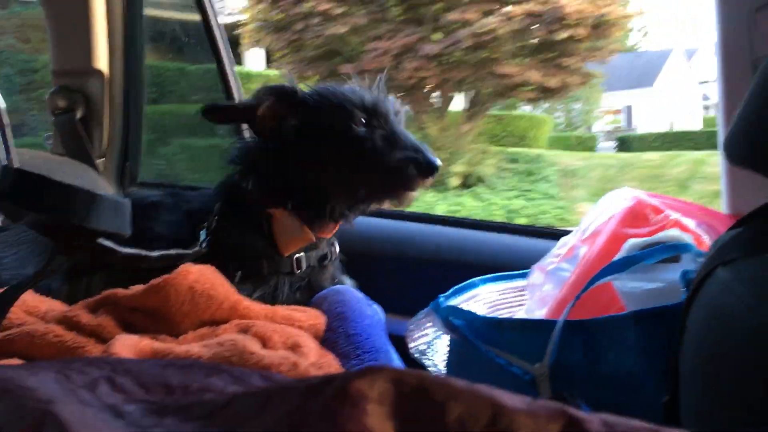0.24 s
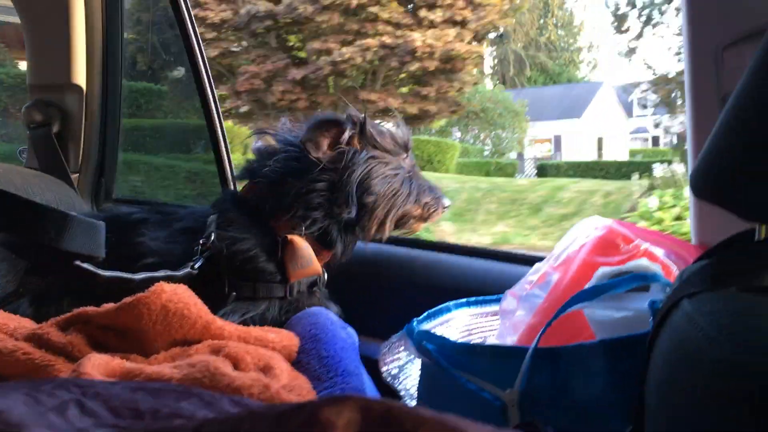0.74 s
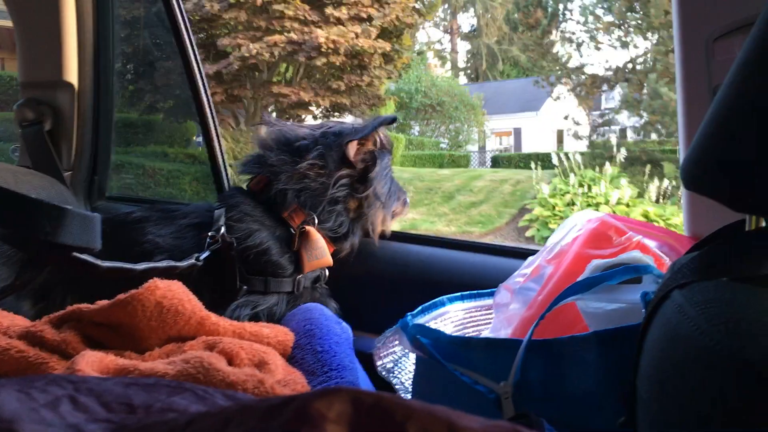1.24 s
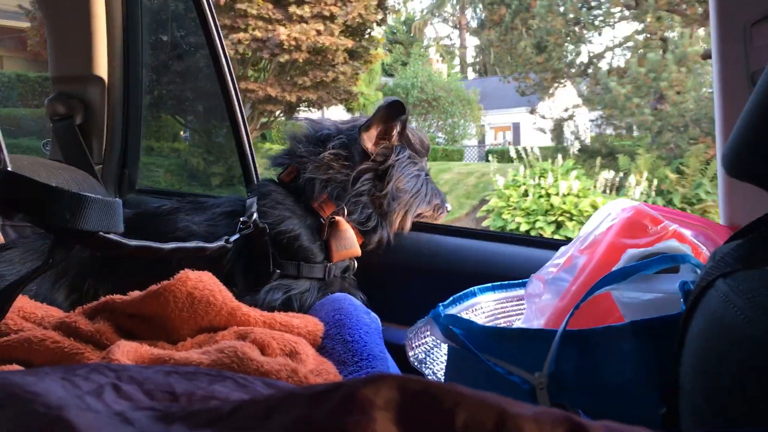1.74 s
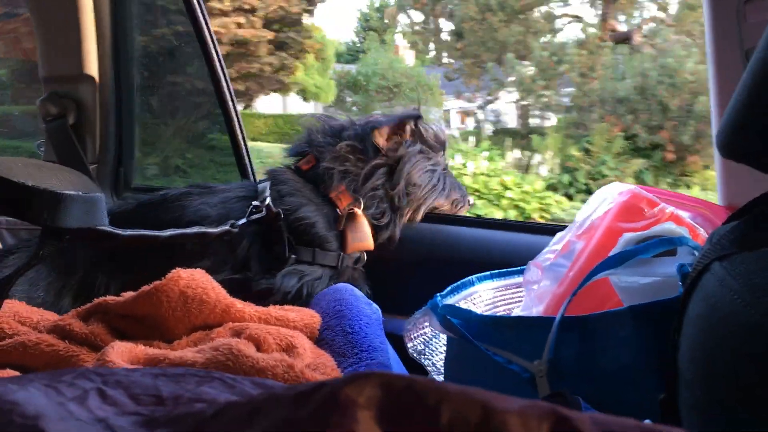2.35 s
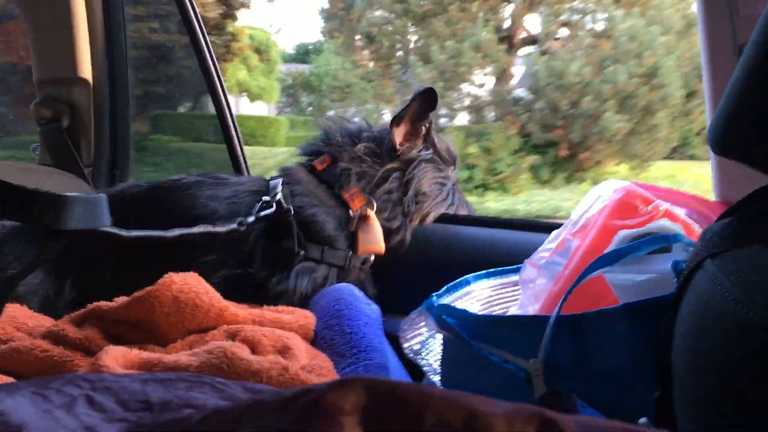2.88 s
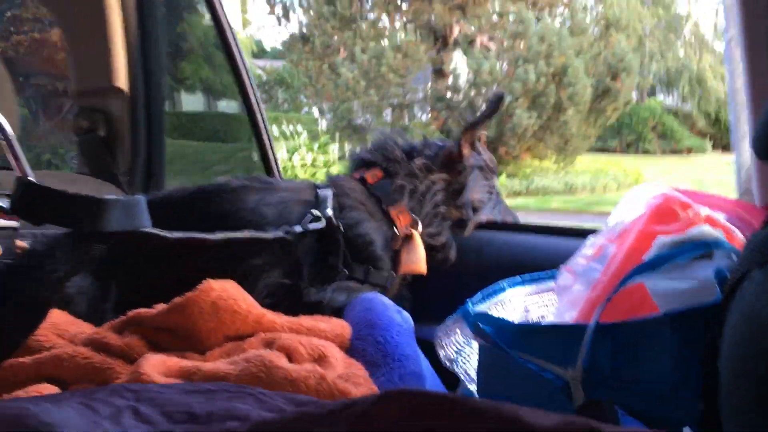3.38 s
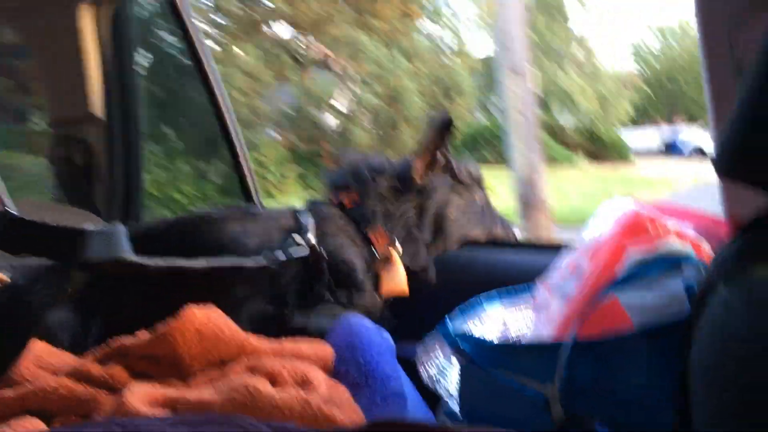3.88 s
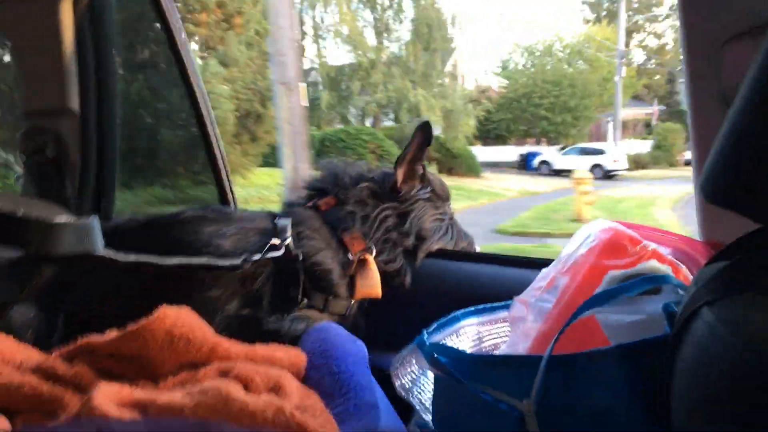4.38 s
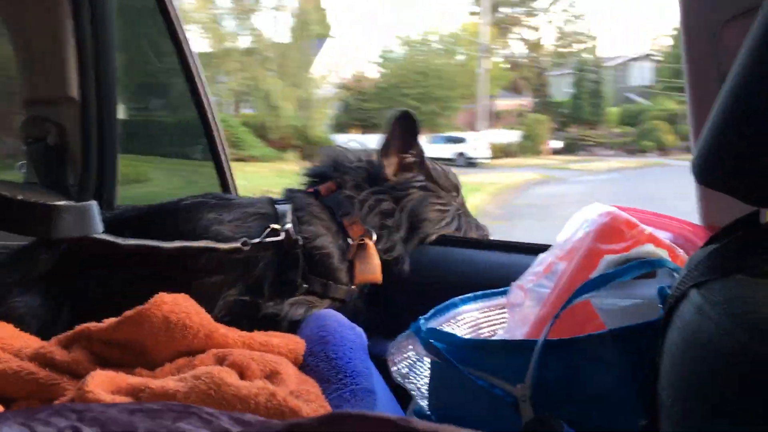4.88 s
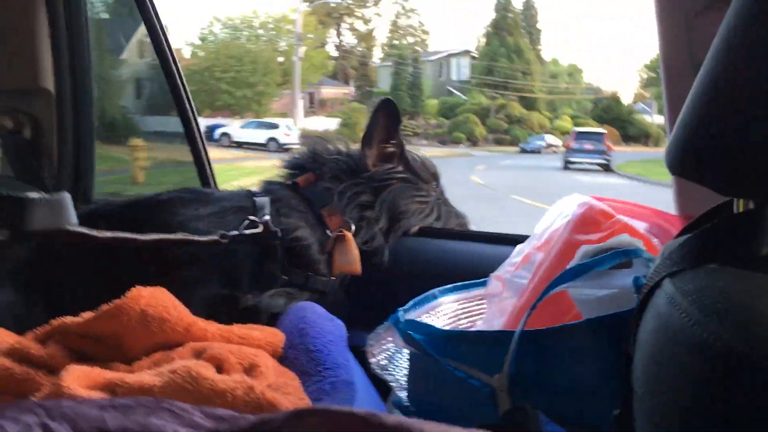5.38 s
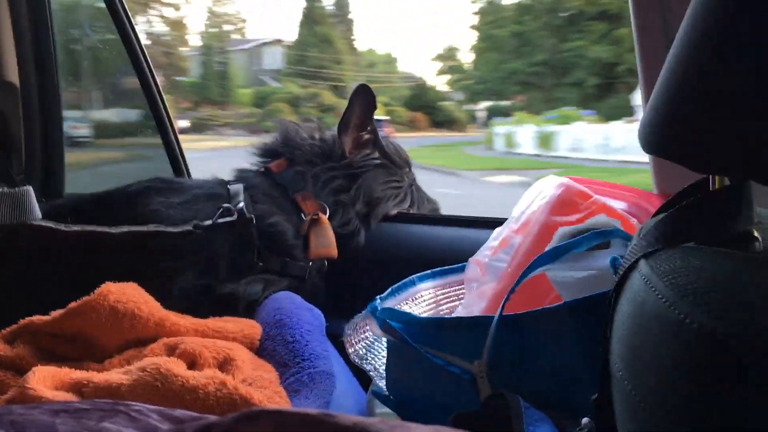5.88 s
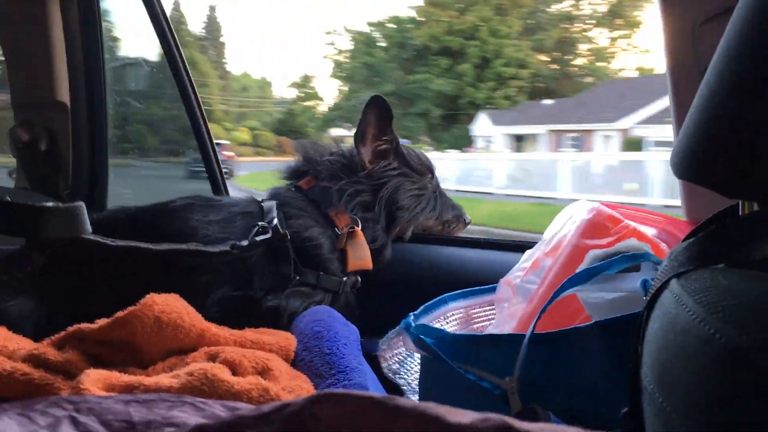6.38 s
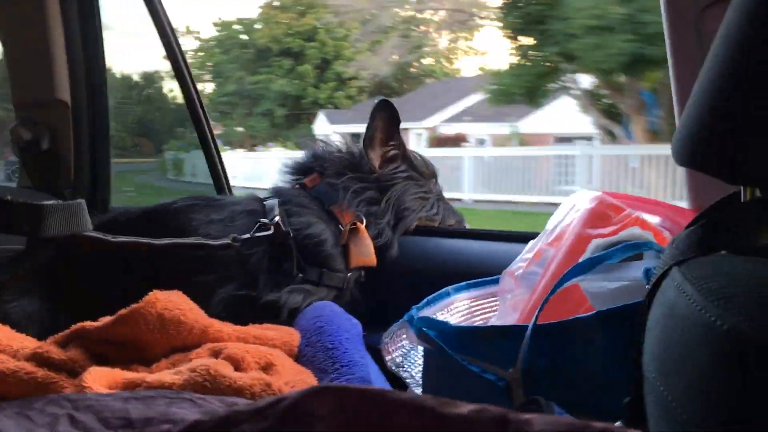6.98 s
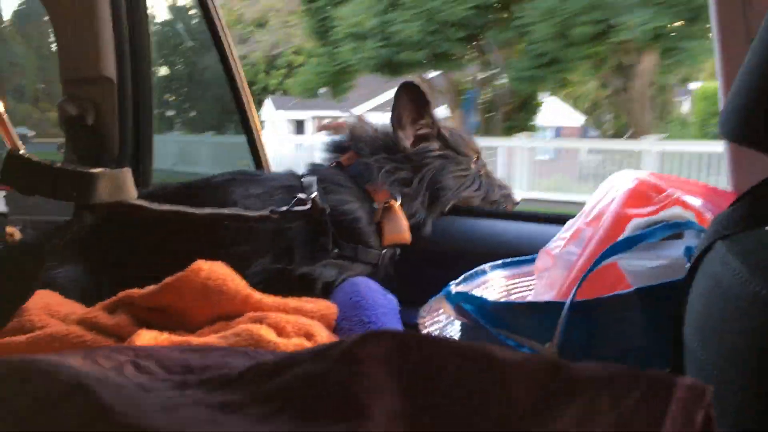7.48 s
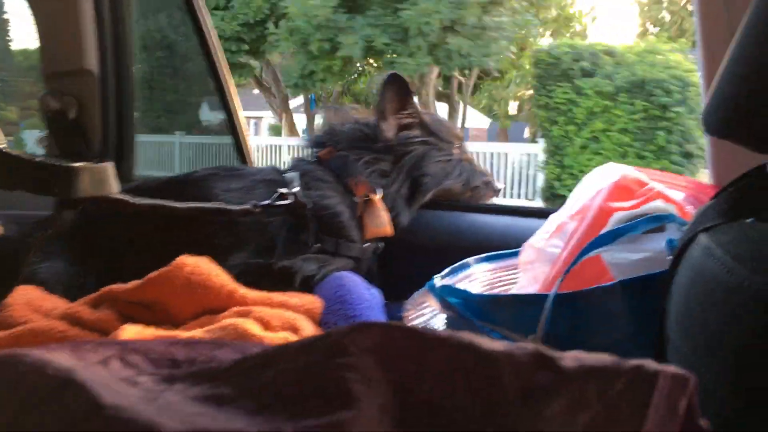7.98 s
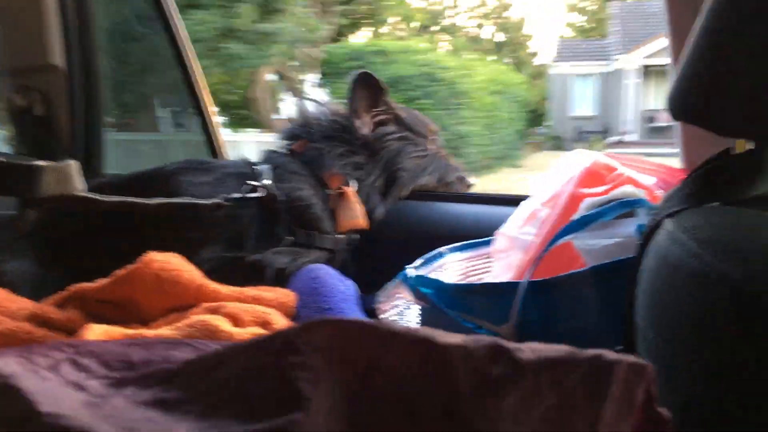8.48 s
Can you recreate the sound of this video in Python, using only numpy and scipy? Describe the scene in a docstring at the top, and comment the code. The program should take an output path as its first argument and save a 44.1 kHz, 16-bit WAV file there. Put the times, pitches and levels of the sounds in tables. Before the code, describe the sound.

A small dog whines in breaking, gliding high notes inside a moving car, over deep road rumble, ticking indicator and a growing engine hum, then snorts.

```python
"""A small dog whines in a car from the start: gliding notes from its vocal folds and a thin whistle near 7.5 kHz.
Road rumble, tyre roar and wind hiss, made of shaped noise, run throughout; bumps ring the car body.
Hard hits and an indicator relay, both bursts of noise, join within a second; the tyres roar louder from 1.7 s.
The engine enters at 3.1 s as a stack of sine tones; at 7.3 s the dog snorts in eight quick flaps of noise.
Dog and small hits get a short cabin echo, and a phone close by cuts the highest treble of everything."""
import sys
import numpy as np
from scipy import signal
from scipy.fft import rfft, irfft
from scipy.io import wavfile
from scipy.ndimage import uniform_filter1d

SR = 44100
rng = np.random.default_rng(int(sys.argv[2]) if len(sys.argv) > 2 else 0)


def transcribe(signal):
    """Save signal, clipped to [-1, 1], as a 16-bit WAV file at the path in sys.argv[1]."""
    frames = np.atleast_2d(signal).T
    limited = np.clip(frames, -1, 1)
    pcm = np.round(limited * 32767).astype(np.int16)
    wavfile.write(sys.argv[1], SR, pcm)


N = 385434
TIME = np.arange(N) / SR  # s
TOP_HZ = 15810  # highest frequency that the phone lets through


def undb(db):
    """Turn a level in dB into a gain."""
    return 10 ** (np.asarray(db) / 20)


def unit(x):
    """Scale a sound to an rms strength of 1."""
    return x / np.sqrt(np.mean(x ** 2))


def shape(points, hz):
    """Read a (frequency [Hz], level [dB]) table at any frequency, along a logarithmic pitch scale."""
    table_hz, db = np.transpose(points)
    return np.interp(np.log(np.maximum(hz, 1)), np.log(table_hz), db)


def walk(rate):
    """Wander at random: levels held for 1 / rate seconds, then smoothed twice; spread near 1."""
    hold = int(SR / rate)
    steps = np.repeat(rng.standard_normal(N // hold + 1), hold)
    smooth = uniform_filter1d(uniform_filter1d(steps, hold), hold)
    return 1.315 * smooth[:N]


def resonant_noise(size, modes):
    """Noise ringing in hollows (Hz, width Hz, dB), each filtered twice for steep sides; rms 1."""
    white, out = rng.standard_normal(size), 0
    for hz, width, db in modes:
        b, a = signal.iirpeak(min(hz, .45 * SR), hz / width, SR)
        once = signal.lfilter(b, a, white)
        out = out + undb(db) * signal.lfilter(b, a, once)
    return unit(out)


def coloured_noise(points, flicker_db, flicker_rate):
    """Noise with the colour of a table; each octave flickers on its own; rms 1."""
    hz = np.fft.rfftfreq(N, 1 / SR)
    lowest_hz, highest_hz = points[0][0], points[-1][0]
    spectrum = rfft(rng.standard_normal(N)) * undb(shape(points, hz)) * (hz > lowest_hz)
    octave = np.log2(np.maximum(hz, 1) / lowest_hz)
    out = np.zeros(N)
    for centre in range(int(np.log2(highest_hz / lowest_hz)) + 2):
        band = irfft(spectrum * np.clip(1 - abs(octave - centre), 0, 1), N)
        out += band * undb(flicker_db * walk(flicker_rate))
    return unit(out)


def phrases(tables, edge_s):
    """Glide through the rows of all notes, with a gate that opens for each; touching notes cross-fade."""
    s, *columns = np.transpose(sorted(row for table in tables for row in table))
    gate = np.zeros(N)
    for table in tables:
        start, end = table[0][0], table[-1][0]
        # a note that starts at zero is open at once
        nearest_edge = np.minimum(TIME - start + (start <= 0), end - TIME)
        gate += np.clip(nearest_edge / edge_s + .5, 0, 1)
    return [np.interp(TIME, s, c) for c in columns], np.minimum(gate, 1)


def add(out, s, sound):
    """Mix a sound in at a given time."""
    i = int(s * SR)
    out[i:i + len(sound)] += sound[:N - i]


def burst(modes, t60_s, rise_s):
    """A puff of ringing noise that rises fast and falls by 60 dB in t60_s."""
    t = np.arange(int(.15 * SR)) / SR
    fade = undb(-60 * t / max(t60_s, .005))
    return resonant_noise(len(t), modes) * np.minimum(t / rise_s, 1) * fade


# how strong the drive sounds: (time [s], rumble level [dB], cabin boom level [dB])
DRIVE_LEVELS = [(0, -32, -65), (1.0, -35, -54), (1.9, -38, -61), (4.26, -32.5, -54), (5.0, -30, -42.5),
                (6.99, -31, -34), (7.45, -32.5, -26), (7.76, -26.5, -35.5), (8.23, -27.5, -29),
                (8.74, -27, -31)]
# colour of the deep rumble: (frequency [Hz], relative level [dB per Hz])
RUMBLE_COLOUR = [(11, -34), (18, -12), (37, 0), (54, -4), (94, -5.5), (124, -17.5), (170, -20.5),
                 (220, -50), (370, -120)]
# colour of the tyre roar: (frequency [Hz], relative level [dB per Hz])
ROAR_COLOUR = [(76, -41), (130, -9.5), (177, -2), (231, -9), (278, -8.5), (352, -16), (397, -15.5),
               (438, -20.5), (635, -22), (900, -31), (1170, -59), (1980, -120)]
# colour of the wind hiss: (frequency [Hz], relative level [dB per Hz])
HISS_COLOUR = [(290, -1.5), (500, -4), (630, -12), (805, -12.5), (943, -4.5), (1100, -9.5), (1390, -3.5),
               (1560, -8), (2110, -7.5), (2900, -16.5), (3260, -15.5), (4410, -19.5), (4880, -23.5),
               (9060, -29.5), (15700, -41)]
ROLL_OFF_S = 1.73
ROAR_DB, ROAR_DB_PER_S = -46, 1.0  # the tyres roar louder as speed builds
HISS_DB, HISS_FADE_DB_PER_S = -52.5, 0.2055  # the hiss is loudest at the roll-off


def road():
    """Body rumble, tyre roar and wind at the open window are noise; the cabin air booms near 78 Hz."""
    s, *columns = np.transpose(DRIVE_LEVELS)
    rumble_db, boom_db = (np.interp(TIME, s, c) for c in columns)
    roar_db = ROAR_DB + ROAR_DB_PER_S * np.maximum(TIME - ROLL_OFF_S, 0)
    hiss_db = HISS_DB - HISS_FADE_DB_PER_S * np.abs(TIME - ROLL_OFF_S)
    rumble = undb(rumble_db) * coloured_noise(RUMBLE_COLOUR, 2.06, 6)
    roar = undb(roar_db) * coloured_noise(ROAR_COLOUR, 0.58, 8)
    hiss = undb(hiss_db) * coloured_noise(HISS_COLOUR, 1.34, 12)
    boom = undb(boom_db) * resonant_noise(N, [(77.9, 18.7, 0)])
    return rumble + roar + hiss + boom


# the throat catches and lets go: (time [s], whistle dip [dB], voice dip [dB])
THROAT_CATCHES = [(1.421, 14, 3), (1.571, 11, 6), (1.601, 29, 30), (1.632, 32, 10), (1.667, 26, 16),
                  (1.709, 9.5, 2), (1.811, 6.5, 5), (1.841, 10, 6), (1.871, 18.5, 7), (1.904, 28, 23),
                  (1.940, 29.5, 17), (1.974, 21.5, -2), (2.446, 13, 18), (2.478, 8.5, 41),
                  (2.623, 14.5, 35)]
CATCH_S = .006  # spread of each catch around its time


def catches():
    """A catch dips whistle and voice (dB); as the throat lets go, slack (near 0 to 1) lingers."""
    whistle_dip, voice_dip, slack = np.zeros((3, N))
    for s, whistle_db, voice_db in THROAT_CATCHES:
        closed = np.exp(-.5 * ((TIME - s) / CATCH_S) ** 2)
        after = np.maximum(TIME - s, 0)
        # pressure held back by the catch makes the release louder
        release = 0.58 * (1 - closed) * (after > 0) * np.exp(-after / 0.023)
        whistle_dip += whistle_db * (release - closed)
        voice_dip -= voice_db * closed ** 4.6
        slack += whistle_db / 30 * np.where(TIME < s, closed, np.exp(-(after / .016) ** 2))
    return whistle_dip, voice_dip, slack


# peaks and dips that throat and cabin put on the voice tones: (frequency [Hz], level [dB])
VOICE_PATH = [(550, 0.5), (640, 3), (800, -3.5), (930, 0), (1000, -6), (1080, -1.5), (1250, -9), (1370, 3),
              (1510, -2.5), (1650, 1.5), (1830, -5), (2200, 1.5), (2550, 3), (2900, -4), (3150, 4),
              (3500, 2.5), (4000, 0.5)]
MOUTH_DB, MOUTH_OCTAVES = 8, 0.1  # lift and half width of the mouth resonance


def passage(hz, mouth_hz):
    """On its way out, a tone meets the moving mouth resonance and fixed peaks and dips; gain in dB."""
    octaves_off = np.log2(hz / mouth_hz)
    return shape(VOICE_PATH, hz) + MOUTH_DB * np.exp(-.5 * (octaves_off / MOUTH_OCTAVES) ** 2)


# vocal fold notes, one list a note; brightness sets the overtones against the effort:
# (time [s], pitch [Hz], effort [dB], brightness [dB], mouth resonance [Hz])
VOICE_NOTES = [
    [(0, 1190, -37, 1.5, 3500), (.014, 1018, -22, -14, 3100), (.026, 937, -20, -17, 2850),
     (.045, 826, -32, -10.5, 2600), (.058, 674, -30.5, -15, 2700), (.068, 610, -33, 3, 2530),
     (.085, 495, -40, -29, 2500)],
    [(.346, 1743, -30.5, -19, 4860), (.365, 1625, -27.5, -23.5, 4850), (.4, 1548, -39, -15.5, 5600),
     (.43, 1416, -34.5, -22, 4460), (.518, 1340, -28, -22, 4000), (.532, 1120, -34, -8, 3300),
     (.548, 1054, -29.5, -8, 3150), (.57, 966, -36.5, -10, 2500), (.585, 767, -36, -10, 2340),
     (.6, 597.5, -30.5, -17, 2200)],
    [(.625, 1700, -44, -26, 1700), (.64, 1860, -43, -28, 1860), (.66, 2000, -62, -20, 2000)],
    [(.815, 1580, -37, -27, 3130), (.85, 1553, -33.5, -26, 3100), (.88, 1390, -32.5, -16, 4140),
     (.905, 1306, -31, -19, 3900), (.935, 1063, -31.5, -10.5, 3520), (1.0, 982, -37.5, -6.5, 3560),
     (1.04, 925, -33, -14, 3300), (1.14, 866, -35.5, -9, 2870), (1.18, 829, -32.5, -12, 2780),
     (1.21, 770, -31.5, -14.5, 2400), (1.238, 650, -36.5, -18, 2200)],
    [(1.402, 930, -49, -20, 3000), (1.432, 1040, -36.5, -28, 3100), (1.443, 1271, -35, -31, 3500),
     (1.52, 1276, -34.5, -26, 3600), (1.537, 1178, -36.5, -29, 2600), (1.58, 1173, -36, -24.5, 2500),
     (1.595, 1297, -29.5, -30, 2700), (1.607, 1106, -36.5, -13.5, 2600), (1.645, 1310, -38, -19.5, 3350),
     (1.75, 1317, -34.5, -26.5, 2800), (1.93, 1312, -35.5, -20, 3200), (1.972, 1249, -35, -23, 3450),
     (2.005, 850, -49, -10, 1970)],
    [(2.315, 519, -57.5, -3.5, 1550), (2.36, 544, -42.5, -12, 1600)],
    [(2.365, 325, -40, -13.5, 1400), (2.389, 339, -33.5, -24, 1380), (2.489, 352, -32.5, -21.5, 1420),
     (2.501, 367, -34, -19, 1450), (2.611, 334, -35.5, -20.5, 1360), (2.648, 320, -35, -21, 1300)],
]
# throat colour for the fourth harmonic and up: (frequency [Hz], level [dB])
THROAT_COLOUR = [(1500, 8), (3200, 8), (4500, 6), (6200, 9), (8000, -29), (10000, 0), (13000, -27),
                 (16000, -26)]
THIRD_DB, UPPER_DB = -5, -12  # third and higher tones against the second
SLACK_HZ, SLACK_RASP = 561, 0.48  # below this pitch the folds always rasp a little


def voice(whistle_dip, voice_dip, slack):
    """Vocal folds make a stack of harmonic tones; when they rasp, strong and weak cycles alternate."""
    (hz, effort_db, bright_db, mouth_hz), voiced = phrases(VOICE_NOTES, 0.0031)
    # the folds lose their grip when the pitch plunges: nepers a second, rasp starts at 8
    plunge = uniform_filter1d(-np.gradient(np.log(hz)) * SR, SR // 100)
    rasp = np.clip(plunge / 8 - 1, 0, 1)
    rasp = np.maximum(rasp, SLACK_RASP * (hz < SLACK_HZ))
    first_db = effort_db + shape(VOICE_PATH, hz)
    second_db = effort_db + bright_db + passage(2 * hz, mouth_hz)
    third_db = effort_db + bright_db + THIRD_DB + passage(3 * hz, mouth_hz)
    upper_db = effort_db + bright_db + UPPER_DB
    # small pitch tremors, rougher while rasping; slack lowers the pitch
    tremor = 0.00421 * walk(150) + 0.0077 * walk(40) + 0.0124 * rasp * walk(400)
    hz = hz * (1 + tremor - 0.028 * slack)
    phase = 2 * np.pi * np.cumsum(hz) / SR
    overtones = undb(second_db + 4.6 * walk(59.8)) * np.sin(2 * phase)
    overtones += undb(third_db + 1.0 * walk(62.0)) * np.sin(3 * phase)
    for k in range(4, 18):
        db = upper_db + passage(k * hz, mouth_hz)
        db += shape(THROAT_COLOUR, k * hz) - shape(THROAT_COLOUR, 4 * hz)
        db += (0.061 * bright_db - .6) * (k - 4) + 2.5 * walk(45)
        overtones += (k * hz < TOP_HZ) * undb(db) * np.sin(k * phase)
    overtones *= 1 + 0.47 * rasp * np.sin(phase / 2)
    first = undb(first_db + voice_dip + 1.0 * walk(61.23)) * np.sin(phase)
    sound = voiced * (first + undb(0.52 * whistle_dip) * overtones)
    return sound, hz, phase, voiced, rasp


# stretches of air noise: (start time [s], end time [s], level at start [dB], level at end [dB])
AIR_STRETCHES = [(0, 0.081, -44, -55), (.11, .2, -58, -62), (0.227, 0.608, -58, -57),
                 (0.624, 0.703, -58, -63), (.78, 1.25, -61, -67), (1.403, 2.023, -69, -63),
                 (2.332, 2.696, -70, -68.5)]
# hollows that colour the air noise: (frequency [Hz], width of one filter pass [Hz], level [dB])
AIR_HOLLOWS = [(1680, 770, -4), (3200, 2400, -6.5), (5930, 2100, -3), (8840, 1400, -4), (12700, 2000, -11)]
AIR_EDGE_S, RASP_AIR_DB = 0.012, 8  # the air turns louder while the folds rasp


def air_noise(rasp, whistle_dip):
    """Each stretch of air noise, coloured by hollows, fades in, slides between two levels and fades out."""
    gain = np.zeros(N)
    for start, end, start_db, end_db in AIR_STRETCHES:
        nearest_edge = np.minimum(TIME - start + (start <= 0), end - TIME)
        gate = np.clip(nearest_edge / AIR_EDGE_S + .5, 0, 1)
        gain += gate ** 2 * undb(np.interp(TIME, [start, end], [start_db, end_db]))
    level_db = RASP_AIR_DB * rasp + 0.68 * whistle_dip + 2.5 * walk(50)
    return gain * undb(level_db) * resonant_noise(N, AIR_HOLLOWS)


# whistle notes, one list a note; side lines are set against the whistle:
# (time [s], pitch [Hz], level [dB], side line level [dB])
WHISTLE_NOTES = [
    [(.012, 7700, -41, 4), (.022, 7570, -43, -12), (.05, 7200, -36, -4), (.072, 6900, -64, 4)],
    [(.228, 6900, -73, -12), (.245, 7550, -45.5, -25), (.31, 7610, -31.5, -35), (.328, 7480, -48, -32),
     (.345, 7500, -30.5, -22), (.36, 7720, -48, -2), (.45, 7630, -46.5, 1), (.495, 7540, -37, -10),
     (.54, 7400, -50.5, 4), (.585, 7040, -39.5, 2), (.596, 7340, -56, -3)],
    [(.733, 6170, -68, -12), (.745, 7240, -40.5, -33), (.757, 7590, -37.5, -31), (.813, 7440, -30.5, -26),
     (.826, 7670, -42, -18), (.87, 7720, -38.5, -17), (.93, 7600, -48, 1.5), (.95, 7370, -46, -9),
     (.99, 7300, -41.5, -9), (1.08, 7170, -48.5, -1.5), (1.19, 7200, -71, 5)],
    [(1.392, 7950, -50, -20), (1.41, 7950, -62, -22), (1.44, 7900, -58, -21), (1.53, 7800, -62, -21),
     (1.6, 7900, -50.5, -11), (1.7, 7600, -54, -19), (1.78, 7650, -57.5, -8), (1.88, 7900, -51.5, -11),
     (2.005, 7720, -51, -26)],
]
# upper side lines win over a high voice, lower ones over a low voice
BALANCE_HZ, ABOVE_DB_PER_OCTAVE = 1340, 12


def whistle(hz, phase, voiced, whistle_dip, slack):
    """A thin tone whose air flow the voice chops, adding side lines one voice pitch apart."""
    (thin_hz, thin_db, side_db), whistling = phrases(WHISTLE_NOTES, 0.0054)
    lean_db = np.clip(ABOVE_DB_PER_OCTAVE * np.log2(hz / BALANCE_HZ), -9, 9) / 2
    below_db, above_db = side_db - lean_db, side_db + lean_db
    thin_db = thin_db + 1.34 * walk(40.26)
    thin = 2 * np.pi * np.cumsum(thin_hz * (1 + 0.0044 * walk(200) - 0.1 * slack)) / SR
    air = resonant_noise(N, [(5970, 750, 0.00038), (8700, 2700, 0.001)])
    sound = np.sin(thin) + undb(-36) * np.sin(2 * thin) + undb(-23) * air
    # side lines 1 to 4 voice pitches away; the last line lies below the whistle's octave
    for k, far_db in ((1, -2.5), (2, -11), (3, -13), (4, -35)):
        lower_db = below_db + 1.95 * far_db + 4.8 * walk(38.8)
        upper_db = above_db + far_db + 4.7 * walk(40.7)
        octave_db = below_db + 0.17 * far_db - 25 + 4.3 * walk(40.3)
        sound += voiced * undb(lower_db) * np.sin(thin - k * phase)
        sound += voiced * undb(upper_db) * np.sin(thin + k * phase)
        sound += voiced * undb(octave_db) * np.sin(2 * thin - k * phase)
    return whistling * undb(thin_db + whistle_dip) * sound


def whine():
    """Voice and whistle share one throat; its catches and rasp shape them and the air noise together."""
    whistle_dip, voice_dip, slack = catches()
    sung, hz, phase, voiced, rasp = voice(whistle_dip, voice_dip, slack)
    whistled = whistle(hz, phase, voiced, whistle_dip, slack)
    # sqrt(2) makes the tone levels count as rms
    return np.sqrt(2) * (sung + whistled) + air_noise(voiced * rasp, whistle_dip)


# the wheels cross a joint in the road: (time [s], level [dB])
ROAD_JOINTS = [(0.063, -28), (.35, -23), (2.072, -23.5), (3.139, -28.5)]
# tones of the car body: (frequency [Hz], level [dB], time to fall 60 dB [s])
BODY_TONES = [(66.8, 4, 0.4), (100.3, -4, 0.27)]


def bumps():
    """Each joint sets the car body ringing: two low sine tones that die away."""
    out, t = np.zeros(N), np.arange(SR // 2) / SR
    ring = np.zeros(len(t))
    for hz, db, t60_s in BODY_TONES:
        ring += undb(db - 60 * t / t60_s) * np.sin(2 * np.pi * hz * t)
    for s, db in ROAD_JOINTS:
        add(out, s, undb(db) * ring * np.minimum(t / 0.033, 1))
    return out


# hard things clack and tick, and a short squeaky hit comes near 8.7 kHz at 8.6 s;
# thud and sparkle are set against the level, all before fixed lifts:
# (time [s], level [dB], centre [Hz], thud [dB], sparkle [dB], time to fall 60 dB [s])
SMALL_HITS = [(0.7998, -61, 3120, 14, -9, 0.022), (2.888, -62, 4050, 11, -24, 0.069),
              (2.9023, -62.5, 3810, 10.5, -24, 0.054), (3.0019, -33.5, 5130, -7, -13, 0.035),
              (4.565, -56, 3600, -2, -7, 0.043), (3.161, -57, 2510, -2, -0.5, 0.046),
              (6.477, -33.5, 3200, -16, -12.5, 0.047), (8.598, -59, 8700, -24, -14, 0.05)]


def small_hits():
    """Clacks, ticks and a squeaky hit: noise of thud, centre and sparkle; cloth and plastic rustle at random."""
    out = np.zeros(N)
    for s, db, hz, thud_db, sparkle_db, t60_s in SMALL_HITS:
        centre = burst([(hz, 0.71 * hz, 0), (3400, 1200, -5)], t60_s, 0.0017)
        thud = burst([(1730, 4200, 0), (1010, 720, -2)], t60_s, 0.0012)
        sparkle = burst([(9100, 1600, 8), (12800, 4200, -1.5)], t60_s, 0.00065)
        add(out, s, undb(db + 3.5) * centre)
        add(out, s, undb(db + thud_db + 6.5) * thud)
        add(out, s, undb(db + sparkle_db + 6.5) * sparkle)
    for when, size, tone in rng.random((40, 3)):
        rustle = burst([(6000 + 7000 * tone, 4000, 0)], 0.04, .003)
        add(out, 2.7 + 6 * when, undb(-73.5 + 12 * size) * rustle)
    return out


# strong and weak click by turns: (strong level [dB], weak level [dB])
RELAY_LEVELS = (-55, -58.5)
RELAY_S, RELAY_PERIOD_S = .9812, .3402  # first click, and time from click to click


def relay():
    """The indicator relay ticks on and off at a steady pace, 19 bright clicks in all."""
    out = np.zeros(N)
    for k in range(19):
        click = burst([(12800, 2900, -2), (6340, 2200, -2)], 0.047, 0.0027)
        add(out, RELAY_S + k * RELAY_PERIOD_S, undb(RELAY_LEVELS[k % 2]) * click)
    return out


# engine speed and load: (time [s], firing rate [Hz], load [dB])
ENGINE_RUN = [(3.12, 37.44, 1), (3.26, 39.44, 4.5), (3.45, 40.52, -4.5), (4.33, 48.5, 0),
              (6.05, 48.73, 1.5), (6.23, 52.18, 2), (7.0, 52.58, 1), (7.5, 55.05, -0.5), (8.3, 58.5, -4.5),
              (8.74, 57.74, -3.5)]
# multiples 1-3 of the firing rate: (level at 50.5 firings a second [dB], rise [dB per Hz])
FIRING_ORDERS = [(-31.5, 0.2), (-38, 1.2), (-47, 0.38)]


def engine():
    """Regular firing makes sine tones at one, two and three times the firing rate."""
    (hz, load_db), running = phrases([ENGINE_RUN], 0.037)
    phase = 2 * np.pi * np.cumsum(hz * (1 + .004 * walk(5))) / SR
    out = np.zeros(N)
    for order, (db, rise) in enumerate(FIRING_ORDERS, 1):
        level_db = load_db + db + rise * (hz - 50.5) + 0.81 * walk(7.3)
        out += undb(level_db) * np.sin(order * phase)
    return np.sqrt(2) * running * out


# the snort, flap by flap, before fixed cuts: (time [s], level [dB])
SNORT_FLAPS = [(7.278, -37.5), (7.2873, -32.5), (7.3008, -27.5), (7.3254, -35.5), (7.3317, -30),
               (7.3503, -33), (7.3714, -35), (7.3884, -41.5)]
# hollows of the snout: (frequency [Hz], width of one filter pass [Hz], level [dB])
SNOUT_HOLLOWS = [(2170, 550, 11.5), (3650, 2500, 2), (5700, 2700, -4), (12200, 2200, -6)]
FLAP_T60_S, FLAP_SPREAD = 0.05, 0.11  # each flap rings the snout a little higher or lower


def snort():
    """Air forced out past flapping nostrils; each flap also knocks the hollow of the snout."""
    out = np.zeros(N)
    for s, db in SNORT_FLAPS:
        snout = []
        for hz, width, gain_db in SNOUT_HOLLOWS:
            shift = np.exp(FLAP_SPREAD * rng.standard_normal())
            snout.append((hz * shift, width, gain_db))
        add(out, s, undb(db - 8) * burst(snout, FLAP_T60_S, 0.00088))
        knock = burst([(480, 170, 0)], 1.5 * FLAP_T60_S, 0.0053)
        add(out, s, undb(db - 3.5) * knock)
    return out


CABIN_T60_S, CABIN_DB = 0.06, -11  # time for the echo to fall 60 dB, and its level


def cabin(x):
    """Glass and seats give a short, dense echo: noise that dies away."""
    t = np.arange(int(.2 * SR)) / SR
    tail = rng.standard_normal(len(t)) * undb(-60 * t / CABIN_T60_S) * (t > .002)
    tail /= np.sqrt(np.sum(tail ** 2))
    return x + undb(CABIN_DB) * signal.fftconvolve(x, tail)[:N]


def scene():
    """Dog and small hits echo in the cabin, over the sounds of the drive."""
    inside = cabin(whine() + small_hits() + relay() + snort())
    return (inside + road() + bumps() + engine())[None]


def record(dry):
    """The phone cuts the top with a steep low-pass filter."""
    low_pass = signal.ellip(14, .2, 90, TOP_HZ, fs=SR, output="sos")
    return signal.sosfilt(low_pass, dry)


dry = scene()
out = record(dry)
transcribe(out)
```